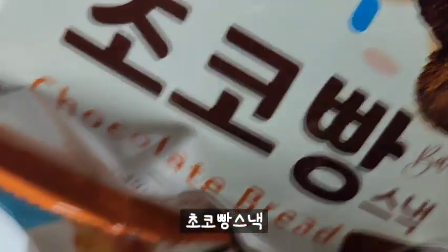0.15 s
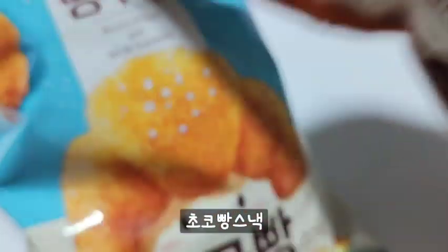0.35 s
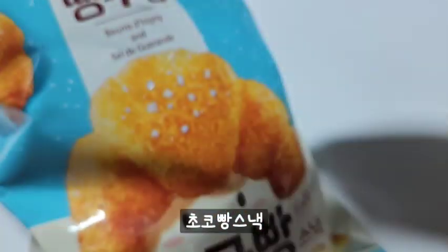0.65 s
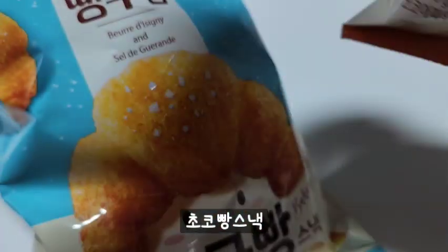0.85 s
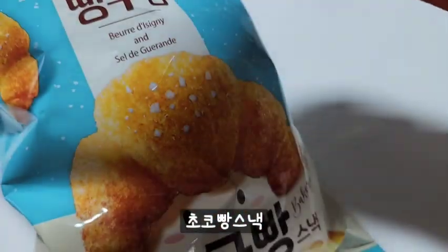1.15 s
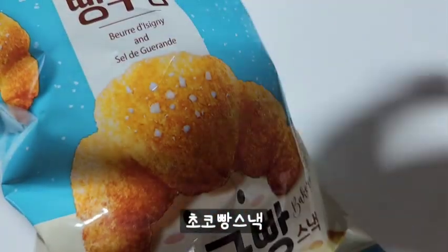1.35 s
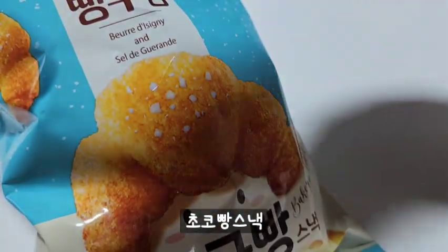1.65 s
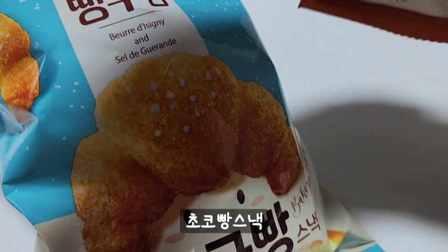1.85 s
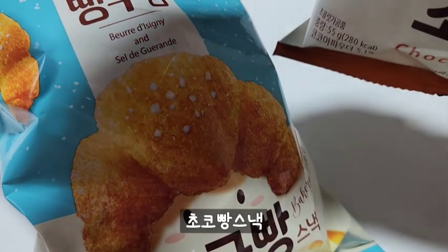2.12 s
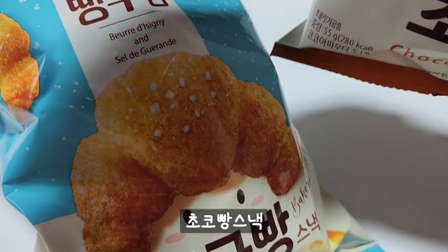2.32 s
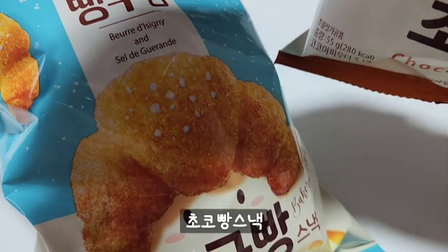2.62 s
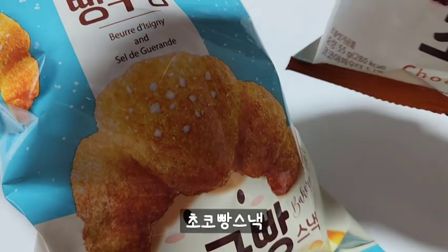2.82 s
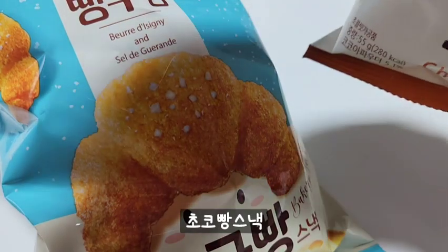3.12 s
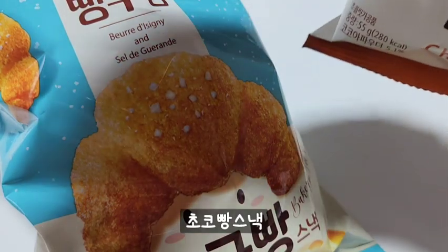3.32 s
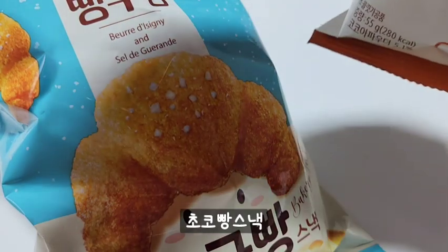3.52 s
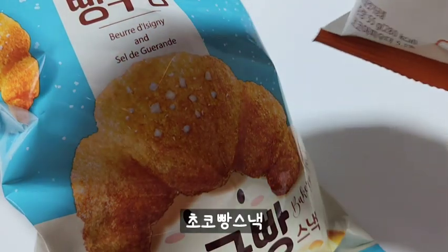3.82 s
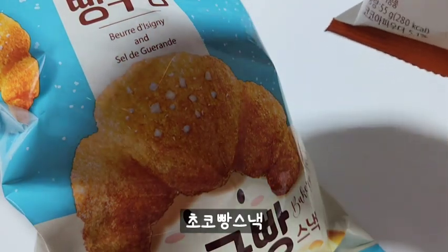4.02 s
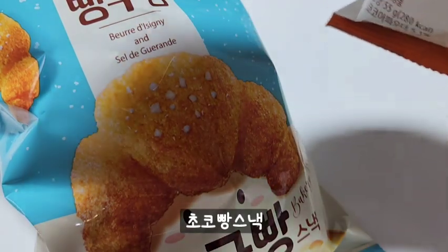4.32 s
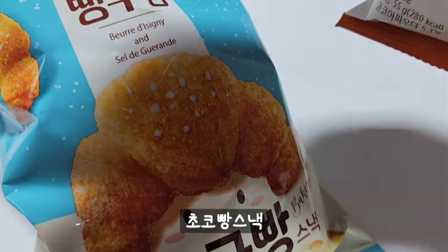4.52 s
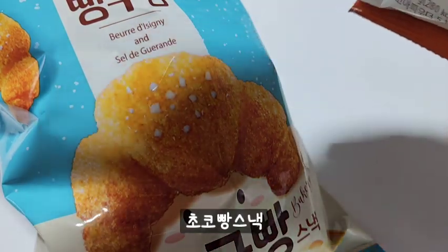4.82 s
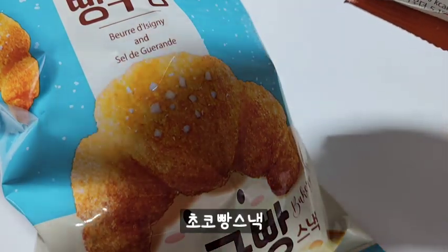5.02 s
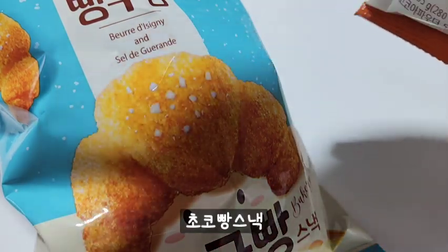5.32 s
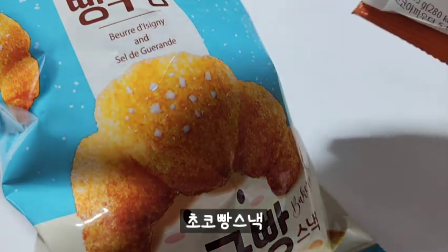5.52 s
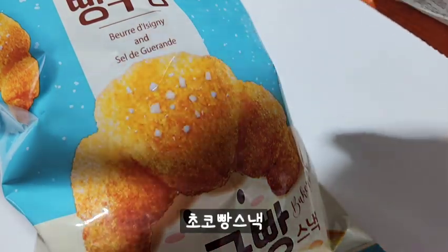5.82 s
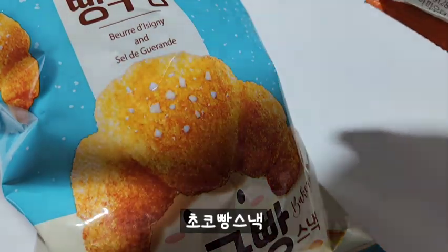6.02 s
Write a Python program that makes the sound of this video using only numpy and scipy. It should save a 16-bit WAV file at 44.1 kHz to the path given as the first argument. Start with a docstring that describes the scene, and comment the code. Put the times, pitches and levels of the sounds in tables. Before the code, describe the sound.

Close, crisp crumpling of a snack packet in a quiet room: a dense early flurry, a hushed gap, then uneven crackling until the cut.

```python
"""A plastic snack bag is crumpled and pulled open by hand, close to a phone's two microphone ports.
Creases snap with a pop (a ringing noise burst) and a tick (a higher one); trapped air thumps as short sines.
Under them, squeezes of the hand swell a crackle of small bursts and a rustle of filtered noise.
Two squeaks are gliding bands of noise, soft knocks are decaying sines, and shaped noise is the quiet room.
The bag is nearer the right port, so the left hears it a few samples later."""
import sys
import numpy as np
from scipy import signal
from scipy.fft import rfft, irfft
from scipy.io import wavfile
from scipy.ndimage import uniform_filter1d

SR = 44100
rng = np.random.default_rng(int(sys.argv[2]) if len(sys.argv) > 2 else 0)


def pcm_store(signal):
    """Save signal as 16-bit PCM."""
    levels = np.round(np.clip(np.atleast_2d(signal), -1, 1) * 32767)
    wavfile.write(sys.argv[1], SR, levels.astype(np.int16).T)


N = 271215

# spectrum of the room tone before it is set to ROOM_DB: pitch_hz, density_db (dB per Hz)
ROOM_SPECTRUM = [(30, -10), (121, 2), (160, -23.5), (402, -27), (620, -23.5), (852, -37.5), (1180, -25),
                 (2500, -35), (4460, -31), (5720, -40), (7500, -24.5), (9000, -40.5), (16000, -42)]
# likeness of the room tone at the two ports: pitch_hz, likeness (0-1)
ROOM_LIKENESS = [(60, 0.88), (290, 0.24), (900, 0)]
# squeezes and brushes of the hand: peak_s, build_s, let_go_s, crackle_db, fizz_db, rumble_db
SQUEEZES = [(.285, 0.18, 0.37, -71, -64.5, -81), (.48, 0.22, 0.7, -69, -55, -83),
            (0.581, 0.16, 0.13, -46, -53, -41.5), (0.861, 0.28, 0.33, -35.5, -39, -36.5),
            (1.004, 0.099, 0.21, -27, -30.5, -32), (1.248, 0.14, 0.22, -27, -29, -30.5),
            (1.467, 0.18, 0.13, -21.5, -23, -29.5), (1.69, 0.22, 0.38, -60, -65.5, -58.5),
            (1.914, 0.13, 0.2, -67.5, -79, -62), (2.464, 0.027, 0.18, -78.5, -61.5, -82),
            (2.701, 0.11, 0.091, -84.5, -59.5, -81.5), (3.01, 0.011, 0.11, -38.5, -46.5, -53),
            (3.183, 0.11, 0.063, -46.5, -56.5, -41.5), (3.379, 0.031, 0.07, -44, -51.5, -41.5),
            (3.62, 0.24, 0.91, -45.5, -75.5, -46), (3.862, 0.42, 0.25, -37, -42, -44.5),
            (4.021, 0.036, 0.12, -24.5, -31, -40), (4.161, 0.11, 0.082, -29.5, -40, -33),
            (4.493, 0.4, 0.22, -31.5, -35.5, -35), (4.658, 0.027, 0.033, -34, -41.5, -36.5),
            (4.781, 0.19, 0.11, -30, -37.5, -35), (5.032, 0.38, 0.066, -29, -30.5, -33.5),
            (5.207, 0.11, 0.14, -32.5, -36.5, -49), (5.277, 0.19, 0.063, -30, -42.5, -32.5),
            (5.367, 0.042, 0.022, -37.5, -42, -48), (5.446, 0.048, 0.07, -31.5, -40, -34),
            (5.559, 0.21, 0.13, -28, -29, -33.5), (5.706, 0.034, 0.37, -38, -50, -42),
            (5.836, 0.22, 0.041, -33, -36.5, -35.5), (5.9, 0.018, 0.29, -57, -42, -49),
            (6.008, 0.17, 0.17, -28, -28.5, -41)]
# colour of the film as the phone hears it: pitch_hz, density_db (dB per Hz)
FILM_COLOUR = [(24, -31.5), (40, -14.5), (106, -6.5), (262, -6), (402, -4.5), (542, 6), (852, -4),
               (1180, 4.5), (1850, -3.5), (3140, -2), (5870, -14.5), (7540, -10), (9450, -22.5),
               (11600, -17.5), (16000, -23)]
# the three parts of a crease: low_hz, high_hz, t60_s (of the core, before each crease's own length),
# rise_s (time constant), same (share of the noise alike at both ports, 0-1)
POP = (300, 6100, 0.008, 0.00064, 0.57)
TICK = (4740, 48000, 0.012, 0.00043, 0.4)
THUMP = (43, 367, 0.023, 0.0024, 0.8)
# air pushed inside the bag: start_s, peak_db (before it leans to a port), pitch_hz
THUMPS = [(0.356, -38.5, 125), (0.547, -29, 272), (0.58, -17.5, 252), (0.732, -27, 200), (0.819, -19, 228),
          (1.005, -24.5, 76), (1.181, -19, 223), (1.237, -21, 139), (1.363, -21, 224), (1.399, -18.5, 250),
          (1.458, -13, 150), (1.643, -20.5, 217.4), (3.025, -26, 178), (3.376, -24.5, 218),
          (3.583, -26, 282), (3.74, -27, 276), (3.835, -24, 370), (3.863, -17.5, 392), (4.021, -17.5, 243),
          (4.153, -23.5, 274), (4.859, -21.5, 232), (4.98, -23, 235), (5.465, -17.5, 313),
          (5.716, -24.5, 350), (5.828, -22.5, 382)]
# decay of the reflections from table and walls: pitch_hz, t60_s
WALL_DECAY = [(300, 0.2), (15000, 0.13)]
# creases that buckle: start_s, pop_pitch_hz, pop_peak_db, tick_peak_db
SNAPS = [(0.552, 1100, -22, -37), (0.5793, 1000, -17, -28), (.6314, 3170, -36, -25),
         (0.7699, 2200, -16.5, -15.5), (0.8253, 3870, -9.5, -21), (0.8559, 3250, -5, -10.5),
         (0.891, 1530, -17, -16), (0.9043, 3570, -5.5, -5), (0.9136, 1260, -14, -15),
         (0.946, 920, -19.5, -29), (0.979, 3330, -1.5, -9.5), (0.9946, 1080, -19.5, -11),
         (1.0064, 4010, -15, -3.5), (1.0126, 3200, -5, -7), (1.047, 870, -15.5, -8),
         (1.1347, 1150, -18.5, -46), (1.1477, 3900, -6, -14), (1.1804, 3300, -6, -6),
         (1.194, 1460, -13.5, -34), (1.198, 1270, -16.5, -24), (1.2059, 1140, -12, -11),
         (1.2224, 3740, -9, -15), (1.2393, 663, -13.5, -2), (1.2448, 3800, -9, -1), (1.251, 2480, -9.5, -6),
         (1.2698, 4236, -10, 0.5), (1.3304, 1120, -17, -22), (1.3463, 999, -20, -44.5),
         (1.36, 2696, -3.5, -11), (1.37, 4660, -7, -30), (1.398, 473, -15, -8), (1.4016, 4160, -2, -10),
         (1.4171, 1520, -11, -10), (1.425, 2510, -7, -9), (1.432, 1700, -9, -19), (1.449, 2880, -2, -17),
         (1.4582, 1240, -10, -27), (1.4639, 4330, -1.5, -6), (1.4745, 3670, -5.5, -10),
         (1.561, 2060, -21.5, -47), (1.641, 420, -28.5, -39), (1.661, 4400, -46, -36),
         (1.6811, 2950, -19.5, -37), (1.6868, 2100, -18, -34), (1.853, 790, -43, -53),
         (1.9043, 950, -35, -62.5), (2.4775, 4260, -49, -38), (2.705, 1110, -56.5, -33.5),
         (2.9216, 1870, -51, -49), (3.0235, 2540, -27.5, -26), (3.077, 2250, -32.5, -69),
         (3.1234, 2620, -19.5, -31), (3.1521, 1350, -22, -25.5), (3.198, 675, -35.5, -49.5),
         (3.356, 578, -31, -45), (3.3776, 643, -28, -39), (3.6075, 2930, -25.5, -30.5),
         (3.6699, 610, -18, -33), (3.728, 2880, -25.5, -32), (3.7418, 575, -18.5, -20.5),
         (3.764, 2800, -17.5, -19.5), (3.806, 1980, -17, -25), (3.816, 3020, -19.5, -20),
         (3.8361, 880, -12, -34), (3.8412, 3190, -24, -9.5), (3.8631, 1880, -7.5, -4.5),
         (3.8806, 2780, -8, -9.5), (3.9565, 2630, -14.5, -29), (4.007, 2000, -8, -14.5),
         (4.024, 3020, -16, -14), (4.0285, 3240, -8.5, -12), (4.0577, 1580, -14.5, -17.5),
         (4.152, 1210, -14.5, -19.5), (4.257, 2890, -31, -53), (4.338, 2380, -22.5, -23),
         (4.369, 900, -15.5, -21), (4.4333, 2150, -21, -15), (4.478, 2700, -5, -4),
         (4.5062, 3000, -24, -12.5), (4.5402, 3130, -22.5, -22), (4.5746, 356, -24, -57),
         (4.638, 3200, -26, -26), (4.648, 1280, -25, -51), (4.6892, 3100, -19.5, -20),
         (4.7794, 1240, -42, -9), (4.7962, 2450, -19.5, -16), (4.838, 1180, -13.5, -13),
         (4.8602, 2550, -12.5, -11.5), (4.9193, 3040, -11.5, -11.5), (4.95, 4480, -40, -20),
         (4.98, 4470, -12.5, -7.5), (5.0086, 3260, -8, -13), (5.017, 2980, -4.5, -6),
         (5.023, 2600, -32, -17), (5.0383, 4600, -17, -14), (5.1167, 3840, -17, -26.5),
         (5.1498, 2690, -32, -19), (5.203, 3100, -42, -14.5), (5.2867, 2080, -18.5, -24.5),
         (5.3027, 2900, -23, -29), (5.366, 4400, -60, -26.5), (5.4197, 2580, -9, -13),
         (5.441, 4940, -18, -19), (5.4678, 655, -15.5, -21), (5.4892, 3730, -16, -16),
         (5.5027, 2700, -9.5, -7.5), (5.559, 3130, -12.5, -22), (5.692, 463, -20, -57),
         (5.7044, 646, -20.5, -15.5), (5.717, 634, -11, -11.5), (5.7673, 496, -19.5, -23.5),
         (5.8249, 2340, -10.5, -10.5), (5.836, 2440, -23.5, -15), (5.893, 3920, -35, -31),
         (5.9748, 1310, -15.5, -43), (5.9814, 2830, -11, -2.5), (5.9992, 3870, -6, -8),
         (6.0085, 2770, -22, -11), (6.04, 4050, -20, -15)]
# soft low knocks as the bag settles: start_s, pitch_hz, level_db (before the slow start), t60_s
KNOCKS = [(1.9041, 578, -26.5, 0.033), (1.938, 216.3, -49.5, 0.22), (2.318, 208, -57, 0.25)]
# a finger slides on taut film, one path per squeak: time_s, pitch_hz, level_db
SQUEAKS = [
    [(3.62, 10800, -61), (3.662, 11400, -47), (3.71, 13300, -55)],
    [(4.26, 8600, -65), (4.335, 10500, -51), (4.37, 11800, -45)],
]

ROOM_DB = -66
SWING_DB = 33  # climb of a squeeze over its build-up, and its fall over its let-go
GENTLE_DB = -62.5  # around this crackle level, creasing gives way to plain sliding
SHEEN_DB, SHEEN_HZ = -5.5, 10500  # hiss of gentle sliding: level against the fizz, low edge
THUMP_CYCLES = 1.8  # cycles until a thump has died by 60 dB
ECHO_DB = -14.5
# least lag of the left port in samples, before and after the bag is moved aside
LAG_BEFORE, LAG_AFTER, MOVED_S = 2, 8, 2.2
BASS_CUT_HZ, TOP_EDGE_HZ = 67, 16050


def gain_of(db):
    """Turns decibels into amplitude."""
    return 10 ** (np.asarray(db) / 20)


def evened(x):
    """Scales a sound to an RMS of one."""
    return x / np.sqrt(np.mean(x ** 2) + 1e-20)


def read(points, hz):
    """Reads a frequency table along a logarithmic pitch axis."""
    f, value = np.transpose(points)
    return np.interp(np.log(hz + 1), np.log(f + 1), value)


def room_tone():
    """Low wavering murmur and faint hiss: noise shaped in pitch, most alike at both ports in the bass."""
    frames, hz = N // 256 + 5, np.fft.rfftfreq(1024, 1 / SR)
    a, b, c, d, patches = rng.standard_normal((frames, 513, 5)).T
    # smooth over pitch, then over time, so that the level wavers in patches
    patches = uniform_filter1d(patches, 10, 0)
    patches = evened(uniform_filter1d(patches, 12, 1))
    same = np.clip(read(ROOM_LIKENESS, hz), -1, 1)[:, None]
    left = a + 1j * b
    right = same * left + np.sqrt(1 - same ** 2) * (c + 1j * d)
    z = np.array([left, right]) * gain_of(read(ROOM_SPECTRUM, hz)[:, None] + 1.5 * patches)
    # a faint whirr near 1.2 kHz dies away at the start
    fade = np.arange(frames) * 256 / SR / 1.0
    z *= 1 + 2.9 * np.exp(-((hz[:, None] - 1170) / 170) ** 2 - fade)
    tone = signal.istft(z, nperseg=1024, noverlap=768)[1][:, :N]
    return gain_of(ROOM_DB) * evened(tone)


def grip():
    """Gains of crackle, fizz and rumble: every squeeze builds up and lets go evenly in dB."""
    s, build, let_go, *levels_db = np.transpose(SQUEEZES)[..., None]
    t = np.arange(0, N + 64, 64) / SR
    down_db = SWING_DB * np.maximum((s - t) / build, (t - s) / let_go)
    gains = []
    for db in levels_db:
        total = np.sqrt((gain_of(db - down_db) ** 2).sum(0))  # squeezes add in power
        gains.append(np.interp(np.arange(N) / SR, t, total))
    return gains


def colour(lo_hz, hi_hz, depth=1):
    """Minimum-phase filter with the film's colour between two edges, its peaks scaled by depth."""
    hz = abs(np.fft.fftfreq(4096, 1 / SR)) + 1
    band = 1 / np.sqrt((1 + (lo_hz / hz) ** 12) * (1 + (hz / hi_hz) ** 12))
    gain = gain_of(depth * read(FILM_COLOUR, hz)) * band
    log_gain = np.log(np.maximum(gain, 1e-5))
    return np.fft.ifft(np.exp(np.conj(signal.hilbert(log_gain)))).real[:2048]


def bursts(part, count, spread, place, ring_hz=None, crack=0.75):
    """Two-port noise bursts, a quick core and a weak tail; each crease has its own length and tint."""
    lo_hz, hi_hz, t60, rise, same = part
    t = np.arange(1024) / SR
    hz = np.fft.rfftfreq(4096, 1 / SR)
    z = rng.standard_normal((count, 3 * 1024 + 1))
    length = np.exp(spread * z[:, -1])[:, None, None]
    if ring_hz is not None:  # small, high facets are over sooner
        ring_hz = ring_hz[:, None, None]
        length = length * (1500 / ring_hz) ** 0.32
    z, same = z[:, :-1].reshape(count, 3, 1024), np.clip(same, 0, 1)
    pair = np.sqrt(same) * z[:, :1] + np.sqrt(1 - same) * z[:, 1:]
    age = t / (t60 * length)
    core, tail = gain_of(-60 * age ** 0.9), gain_of(-13.5 - 20 * age)
    pair *= (1 - np.exp(-t / rise)) * (core + tail)
    pair[..., 4] += crack * np.linalg.norm(pair, axis=2)  # the crease gives way in one sharp step
    spectrum, body = rfft(pair, 4096), rfft(colour(lo_hz, hi_hz), 4096)
    octaves = np.log2(hz + 1)
    tint_db = 3.5 * np.sin(2 * np.pi * (0.8 * octaves + rng.random((count, 1, 1))))
    spectrum *= gain_of(tint_db)
    # creases lie at different places, so the left port lags by up to 8 samples more
    spectrum[:, 0] *= np.exp(-2j * np.pi * np.fft.rfftfreq(4096) * 8 * place[:, None])
    if ring_hz is not None:  # the flat facet beside the crease rings for a few cycles
        ratio = hz / ring_hz
        resonance = 1j * ratio / (2.3 * (1 - ratio ** 2) + 1j * ratio)
        ring = rfft(colour(lo_hz, hi_hz, depth=0.88), 4096) * resonance
        body = 0.3 * body / (1 + 1j * ratio / 5.4) + ring
    pair = irfft(spectrum * body)[..., :2048]
    peak = np.sqrt((abs(signal.hilbert(pair)) ** 2).mean(1).max(1))
    return pair / peak[:, None, None]


def handling():
    """Countless small creases, a few of them large, melt into a rustle of sliding film."""
    gains = grip()
    crackle = gains[0]
    creasing = crackle / np.hypot(crackle, gain_of(GENTLE_DB))
    # as the hand lets go, the grip drops below its recent average and creases sink under the rustle
    held = signal.lfilter([1 / 1300], [1, 1 / 1300 - 1], crackle)
    pressing = creasing * np.minimum(crackle / (held + 1e-9), 1) ** 0.27
    size_db = 5.5 * np.minimum(rng.exponential(1, N), 3.2)
    size = gain_of(size_db) * (rng.random(N) < 700 / SR)  # about 700 creases a second
    crease = rng.integers(0, 24, N)  # which of 24 burst shapes sounds
    facets_hz, place = np.geomspace(520, 4200, 24), rng.random(24)
    out = np.zeros((2, N))
    parts, rustles, rings = (POP, TICK, THUMP), (.45, .55, .55), (facets_hz, None, None)
    for gain, part, rustle, ring in zip(gains, parts, rustles, rings):
        lo_hz, hi_hz, same = part[0], part[1], part[4]
        grains = np.zeros((2, N))
        for k, grain in enumerate(bursts(part, count=24, spread=0.72, place=place, ring_hz=ring)):
            grains += signal.oaconvolve((size * (crease == k))[None], grain, axes=1)[:, :N]
        z = rng.standard_normal((3, N))
        slide = np.sqrt(1 - min(same, 1)) * z[1:] + np.sqrt(same) * z[0]
        slide[0] = np.roll(slide[0], 4)
        slide = signal.oaconvolve(slide, colour(lo_hz, hi_hz)[None], axes=1)[:, :N]
        mix = pressing * evened(grains) + rustle * evened(slide)
        out += gain * mix / np.hypot(pressing, rustle)
    # gentle sliding hisses in the top
    z = rng.standard_normal((2, N))
    sheen = signal.oaconvolve(z, colour(SHEEN_HZ, TICK[1])[None], axes=1)[:, :N]
    return out + gain_of(SHEEN_DB) * gains[1] * (1 - creasing) * evened(sheen)


def played(s, sounds):
    """Lays each sound at its time."""
    out = np.zeros((2, N + 2048))
    for at, sound in zip((s * SR).astype(int), sounds):
        out[:, at:at + 2048] += sound
    return out[:, :N]


def thumps():
    """The trapped air swings out and back once or twice, nearer one port or the other."""
    s, db, hz = np.transpose(THUMPS)[..., None]
    turns = hz * np.arange(2048) / SR
    swing = -np.sin(2 * np.pi * turns)
    swing *= (1 - np.exp(-turns / 0.64)) * gain_of(-60 * turns / THUMP_CYCLES)
    swing *= gain_of(db) / abs(swing).max(1, keepdims=True)
    lean_db = 1.6 * rng.standard_normal((len(s), 1, 1)) * [[1], [-1]]
    return played(s[:, 0], swing[:, None] * gain_of(lean_db))


def walls(x):
    """Scattered echoes of random sign, each band dying at its own speed."""
    taps = np.zeros((2, SR // 2))
    starts = np.arange(260, SR // 2 - 20, 20)
    at = starts + rng.integers(0, 20, (2, len(starts)))
    np.put_along_axis(taps, at, rng.choice([-1., 1.], at.shape), 1)
    hz, t, z = signal.stft(taps, SR, nperseg=256)
    decay = gain_of(-60 * t / read(WALL_DECAY, hz)[:, None])
    tail = signal.istft(z * decay, SR, nperseg=256)[1]
    return signal.fftconvolve(x, tail / np.linalg.norm(tail[0]), axes=1)[:, :N]


def snaps():
    """Each buckling crease sounds its pop and tick together."""
    s, ring_hz, pop_db, tick_db = np.transpose(SNAPS)
    place = rng.random(len(s))
    pops = bursts(POP, count=len(s), spread=0.028, place=place, ring_hz=ring_hz)
    ticks = bursts(TICK, count=len(s), spread=0.058, place=place)
    return played(s, gain_of(pop_db)[:, None, None] * pops + gain_of(tick_db)[:, None, None] * ticks)


def knocks():
    """Soft low sine rings with a slow start, the same at both ports."""
    out = np.zeros(N)
    for s, hz, db, t60 in KNOCKS:
        t = np.maximum(np.arange(N) / SR - s, 0)
        rise = 1 - np.exp(-t / (0.021 * t60))
        out += gain_of(db - 60 * t / t60) * rise * np.sin(2 * np.pi * hz * t)
    return out


def squeaks():
    """Narrow noise bands glide upward and flicker in level as the skin sticks and slips."""
    out = np.zeros((2, N))
    for rows in SQUEAKS:
        s, hz, db = np.transpose(rows)
        t = np.arange(s[0], s[-1], 1 / SR)
        z = uniform_filter1d(rng.standard_normal((2, 2, len(t))), 100)
        flicker = evened(uniform_filter1d(rng.standard_normal(len(t)), 200))
        z *= gain_of(1.5 * flicker)
        # slow noise is shifted up to the gliding pitch
        turn = np.exp(2j * np.pi * np.cumsum(np.interp(t, s, hz)) / SR)
        squeak = evened(((z[0] + 1j * z[1]) * turn).real)
        out[:, int(s[0] * SR):][:, :len(t)] += gain_of(np.interp(t, s, db)) * squeak
    return out


def scene():
    """The bag, with snaps and thumps echoing, over its knocks and the room; the left port hears the bag late."""
    cracks = snaps() + thumps()
    bag = cracks + gain_of(ECHO_DB) * walls(cracks) + handling() + squeaks()
    before, after = np.roll(bag[0], LAG_BEFORE), np.roll(bag[0], LAG_AFTER)
    bag[0] = np.where(np.arange(N) < MOVED_S * SR, before, after)
    return bag + knocks() + room_tone()


def record(dry):
    """Long waves differ less between ports; bass is cut, the left is duller in bass and top, peaks clip."""
    hz = np.fft.rfftfreq(N, 1 / SR)
    left, right = rfft(dry)
    middle = (left + right) / 2
    side = (left - right) / 2 * np.hypot(hz, 900) / np.hypot(hz, 1100)
    # left against right: pitch_hz, balance_db
    balance_db = read([(60, -2.0), (500, -0.8), (3000, 2.5), (9000, -3.0)], hz)
    bass = hz ** 2 / np.hypot(hz ** 2, BASS_CUT_HZ ** 2)
    ports = irfft((middle + [side, -side]) * bass * gain_of([balance_db / 2, -balance_db / 2]), N)
    top_cut = signal.firwin(255, TOP_EDGE_HZ, window=("kaiser", 9), fs=SR)
    return signal.oaconvolve(np.clip(ports, -1, 1), top_cut[None], "same")


dry = scene()
out = record(dry)
pcm_store(out)
```